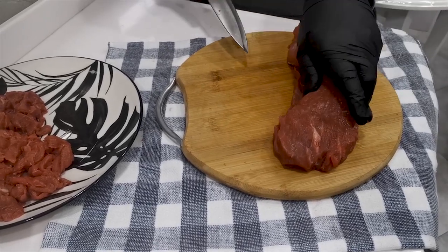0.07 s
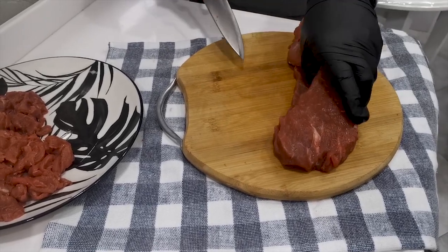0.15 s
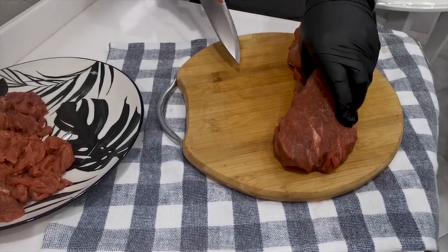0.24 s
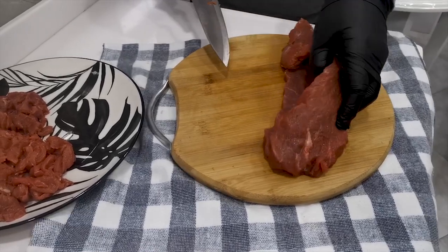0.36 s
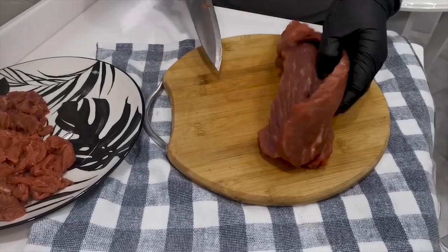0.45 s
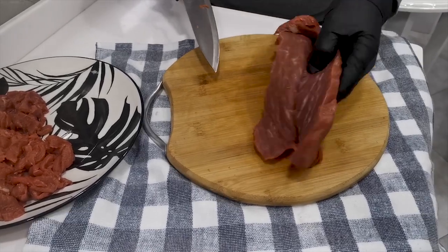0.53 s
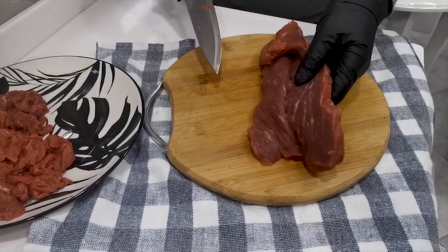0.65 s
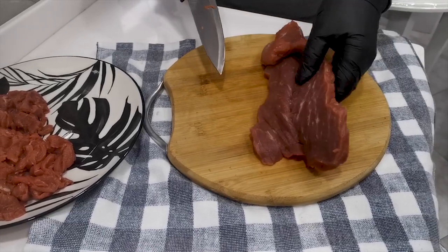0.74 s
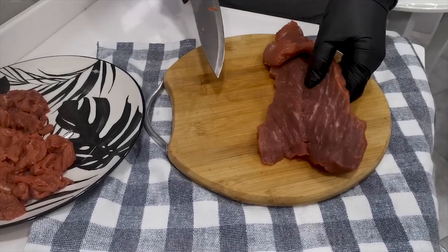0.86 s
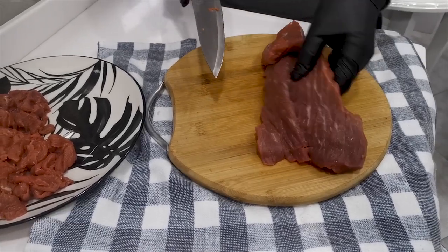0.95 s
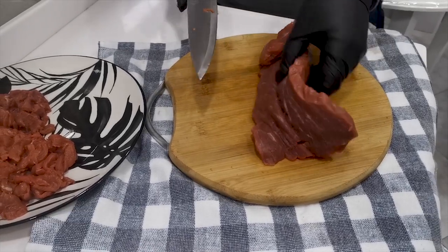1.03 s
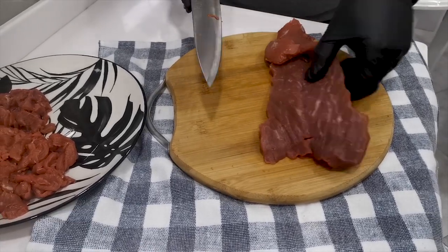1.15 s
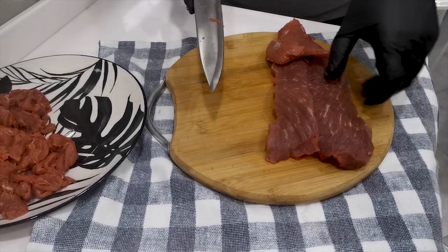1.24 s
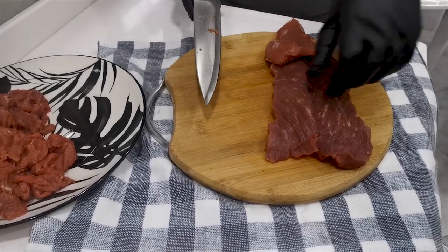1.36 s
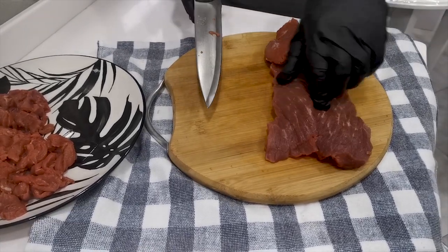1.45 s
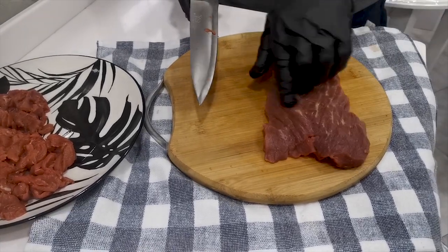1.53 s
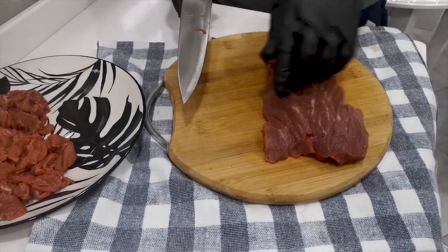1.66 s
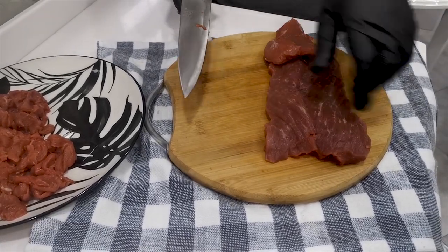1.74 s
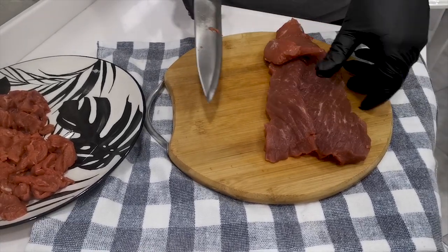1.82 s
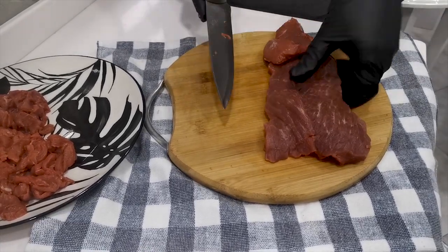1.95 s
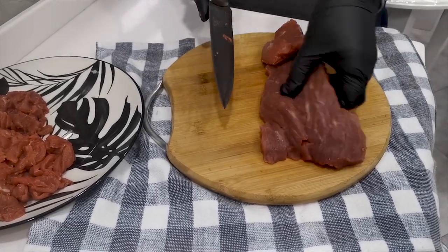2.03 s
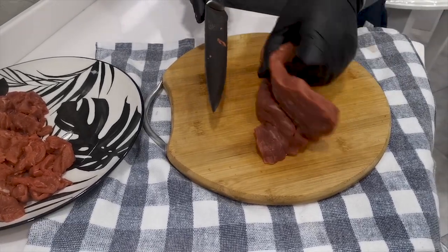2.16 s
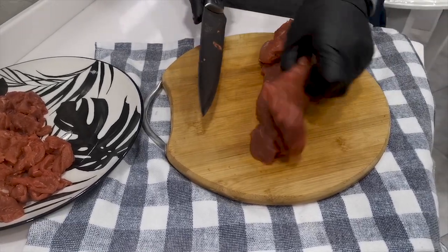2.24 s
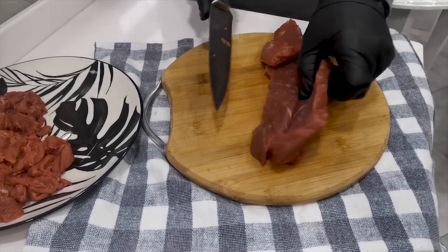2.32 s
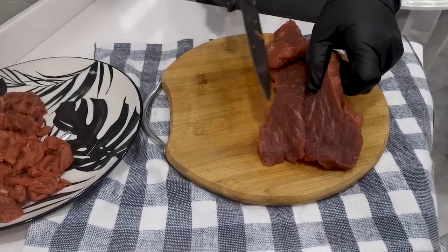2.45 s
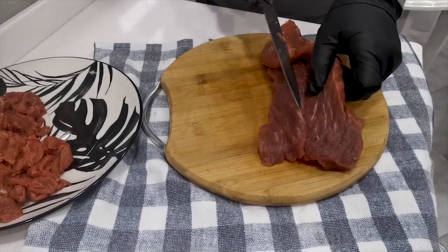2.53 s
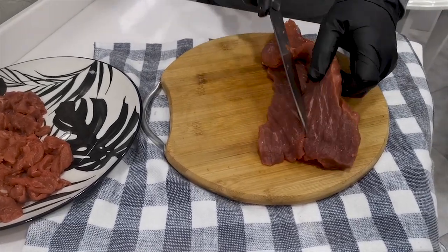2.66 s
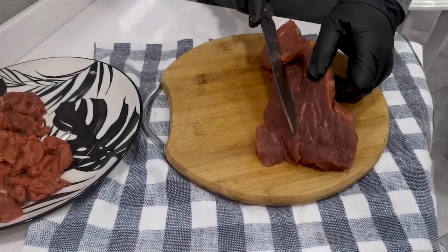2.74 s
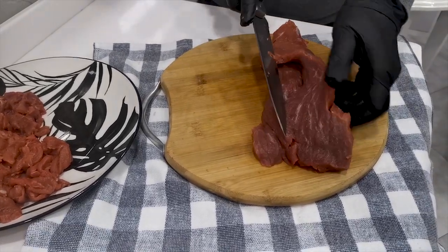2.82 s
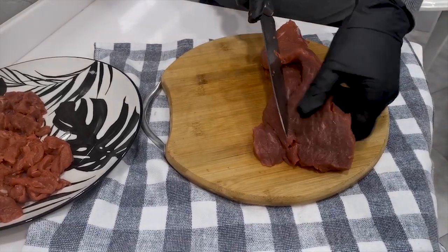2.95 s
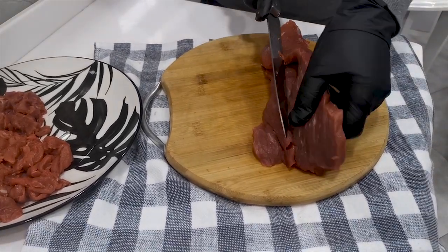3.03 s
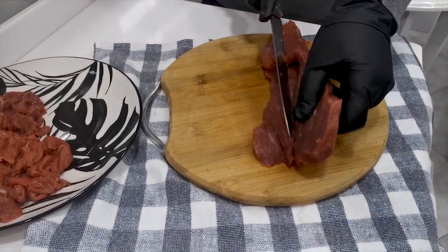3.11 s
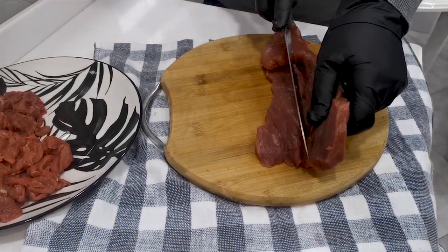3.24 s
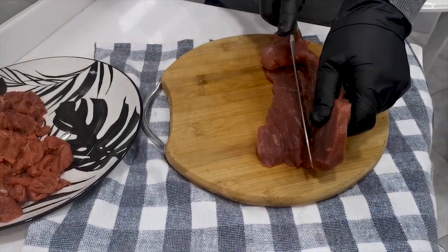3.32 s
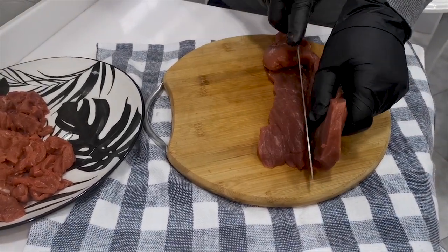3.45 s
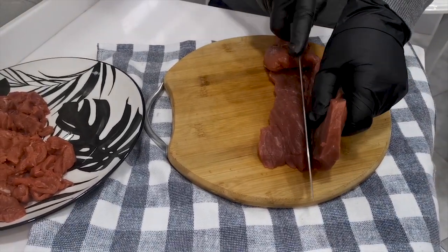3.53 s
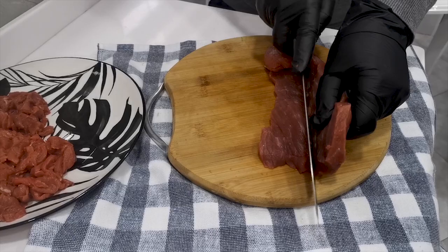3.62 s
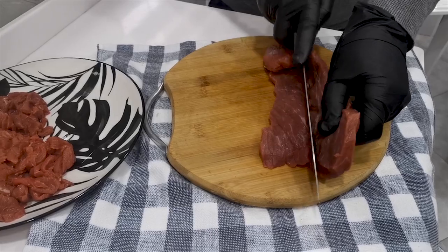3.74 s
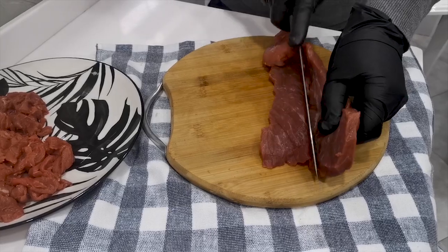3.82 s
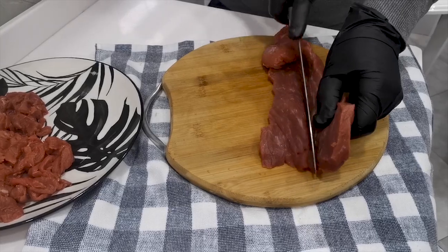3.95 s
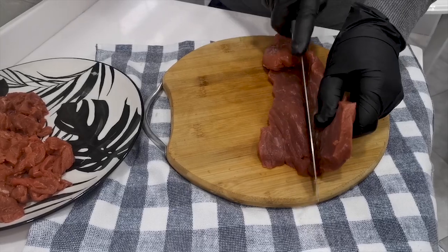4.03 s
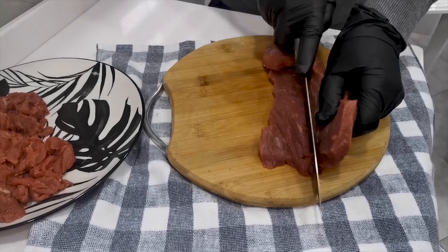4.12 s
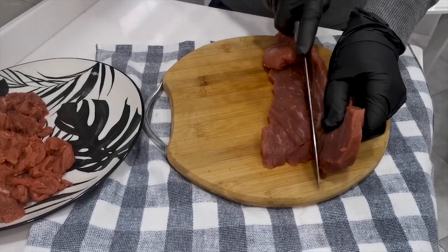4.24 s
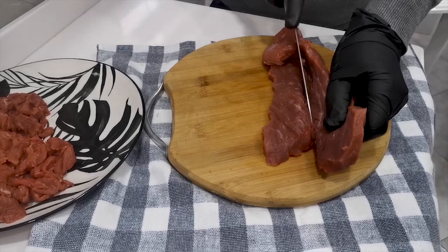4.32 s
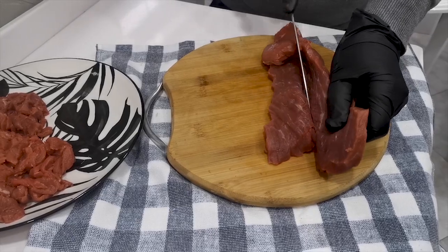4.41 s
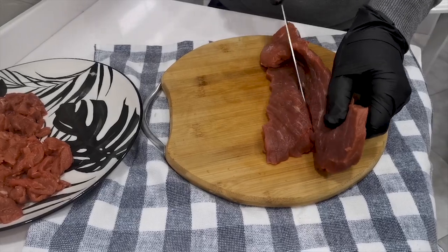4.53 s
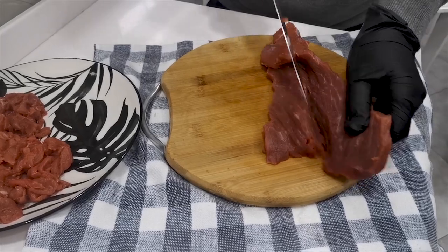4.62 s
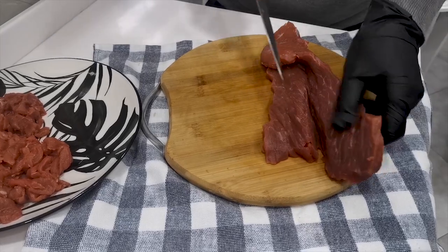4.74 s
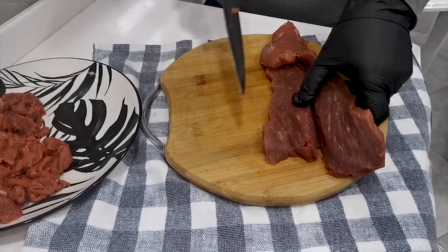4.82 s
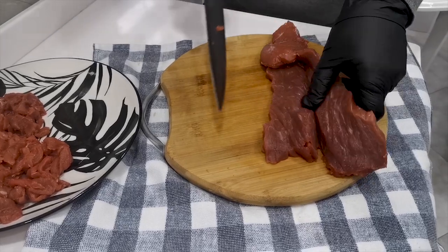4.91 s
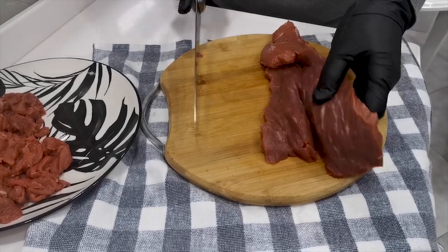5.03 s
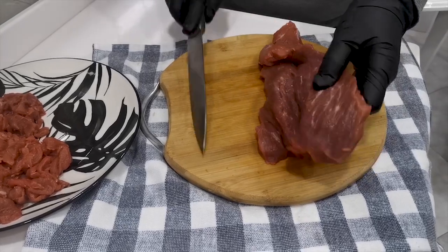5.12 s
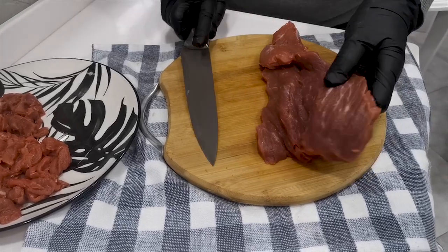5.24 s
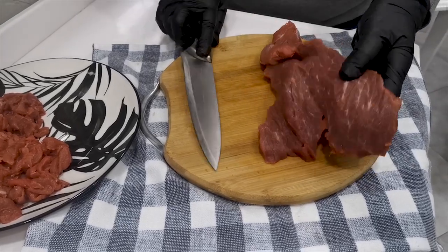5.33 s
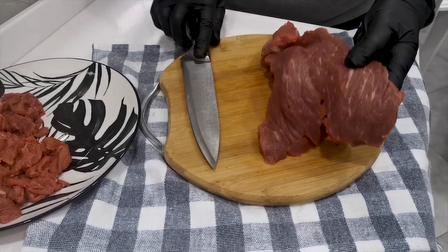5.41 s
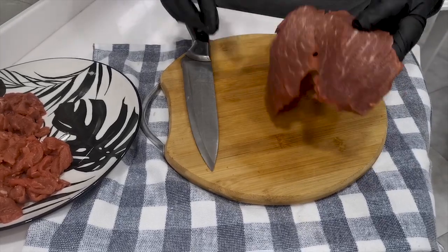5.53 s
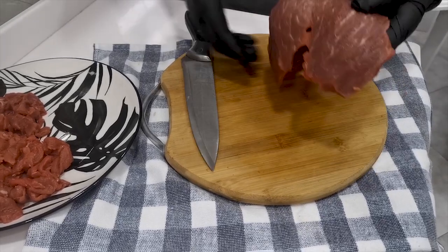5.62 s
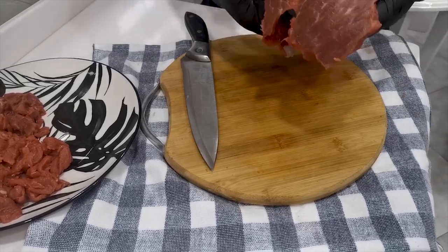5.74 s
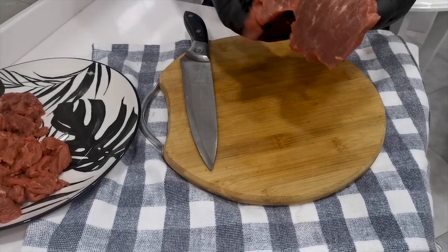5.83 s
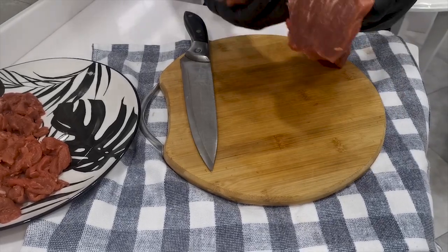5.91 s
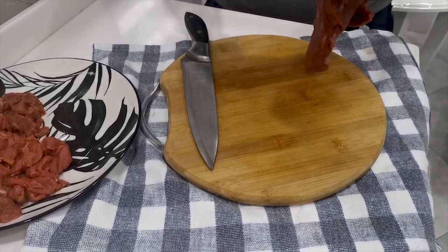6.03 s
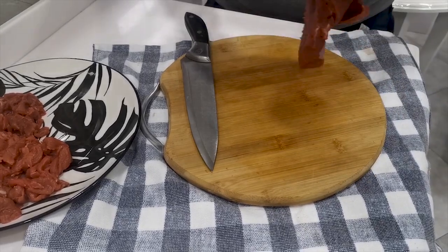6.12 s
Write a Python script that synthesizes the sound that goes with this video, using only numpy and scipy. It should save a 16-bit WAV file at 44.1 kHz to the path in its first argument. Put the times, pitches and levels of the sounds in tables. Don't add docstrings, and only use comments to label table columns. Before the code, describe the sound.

Close stereo pickup over a cutting board in a small reflective kitchen: moist flesh peels and slaps, a rubbery glove ticks and squeaks, and the worktop booms softly under each drop. The handling thins out to faint slicing rubs, broken by one solid thud. More squelching leads to two sharp knife clacks on wood with small bounces, then light sticky handling and a low breeze of air over constant faint hum and hiss.

```python
import sys
import numpy as np
from scipy import signal
from scipy.fft import rfft, irfft, next_fast_len
from scipy.io import wavfile
from scipy.ndimage import map_coordinates

SR = 44100
rng = np.random.default_rng(int(sys.argv[2]) if len(sys.argv) > 2 else 0)


def inscribe(sig):
    pcm = np.round(np.clip(np.atleast_2d(sig).T, -1, 1) * 32767)
    wavfile.write(sys.argv[1], SR, pcm.astype(np.int16))


def invert_db(level):
    return 10 ** (np.asarray(level, dtype=float) / 20)


N = 272097

# frequency in Hz, level in dB per Hz.
ROOM_HUM = [(18, -23), (32, -1), (60, -0.5), (230, -8), (401, -4.5), (600, -11), (791, -17), (968, -14),
            (1070, -19.5), (2060, -19.5), (2460, -27), (2650, -20), (4170, -35), (6720, -29.5),
            (12300, -64), (16000, -91), (22000, -120)]
HUM_DB = -69
# frequency in Hz, level in dB per Hz.
PORT_HISS = [(500, -32), (2000, -11), (7000, -18.5), (11800, -37), (13500, -82)]
# frequency in Hz, time to fall 60 dB in seconds.
KITCHEN_DECAY = [(100, 0.92), (500, 0.73), (1500, 0.46), (4000, 0.17), (10000, 0.16)]
# frequency in Hz, left over right in dB, left lead in radians,
# likeness from 0 to 1.
PORT_DIFFERENCE = [(99, 6, 0.78, 0.94), (597, 3, 0.02, 0.77), (1370, 4, 0.14, 0.75), (2080, -4, 0.5, 0.82),
                   (2890, -3, 0.76, 0.96), (3510, -3, 1.37, 0.16), (4710, 3.5, 3.5, 0.79),
                   (5020, 10, 4, 0.96), (6970, 8, -1, 0.05), (7010, 10, 4.5, 0.11), (8800, -0.5, 4, 0.17),
                   (10700, 0, 3.5, 0.6), (14960, 3, 6.5, 0.92)]
# start in seconds, level in dB, frequency in Hz.
AIR_PUFF = (6.09, -50, 20)

# peak in seconds, swell in seconds, fade in seconds, worktop level in dB,
# board level in dB.
PRESSES = [(0, .05, 0.28, -61, -53.5), (.22, 0.058, 0.076, -58, -61), (0.477, 0.0083, 0.14, -52.5, -43),
           (0.664, 0.0061, 0.12, -46, -42.5), (1.29, 0.49, 0.83, -73, -59.5),
           (1.911, 0.0058, 0.12, -43, -43), (3.88, 0.19, 0.082, -74, -96), (4.152, 0.02, 0.085, -42, -34),
           (4.33, 0.1, .22, -48, -45), (4.9, 0.15, 0.065, -57, -63), (5.244, 0.007, 0.31, -59, -39.5),
           (5.42, 0.0041, 0.045, -56.5, -29), (5.5, 0.066, 0.15, -41, -51), (5.53, .1, 0.24, -52.5, -41),
           (6.1, 0.22, 0.058, -62, -72)]
RESTING_DB = -84, -75
# frequency in Hz, level in dB per Hz.
WORKTOP_MURMUR = [(30, -45.0), (55, -2.5), (75, -1.5), (100, -1.5),
                  (132, -18.5), (165, -8.0), (210, -9.0), (330, -55.0)]
BOARD_MURMUR = [(150, -41.5), (290, 1.5), (420, 1.5), (600, 1.0), (850, -12.0), (1300, -79)]
# frequency in Hz, time to fall 60 dB in seconds.
WORKTOP_MODES = [(75, 0.12), (130, 0.33)]
# start in seconds, peak level in dB, knock frequency in Hz, low mode in dB,
# upper mode in dB.
DROPS = [
    (0.662, -32, 476, -40, -17),
    (1.115, -47.5, 503, -12, -22.5),
    (1.316, -54.5, 420, 6.5, -13),
    (1.905, -34, 362, -35, -20),
    (1.906, -36.5, 536, -40, -40),
    (4.1444, -24.5, 366, -24, -36),
    (4.145, -29, 816, -33, -39),
    (4.312, -41.5, 350, -3, -18),
]

# start in seconds, blow level in dB, end (0 handle, 1 blade),
# brightness in dB an octave, ring level in dB.
KNIFE_CONTACTS = [
    (5.2391, -10, 0, 0.5, -18),
    (5.4155, -9, 1, 2.5, -21.5),
    (5.4195, -24, 1, 2, -21),
    (5.4684, -20.5, 1, 3, -19.5),
    (5.4825, -22, 0.99, -1, -21),
    (5.4895, -26, 0, 1, -26),
    (5.5011, -31, 1, -2, -22),
    (5.519, -29, 0.11, 1, -25),
    (4.1451, -32.5, 0, -7.5, -33),
]
# frequency in Hz, level in dB, time to fall 60 dB in seconds.
KNOCK_MODES = [
    [(552.5, 3, 0.016), (1065, 8.5, 0.012), (1796, 2.5, 0.013), (2790, 9, 0.006), (3650, -7, 0.013),
     (4730, -18.5, 0.02), (6400, -18.5, 0.0067)],
    [(584, -9, 0.014), (1070, 3.5, 0.0049), (1720, -1, .006), (2080, 1, 0.0089), (2660, -3, 0.01),
     (4060, 1.5, 0.0048), (5200, -27.5, 0.014), (5900, -24, 0.011)],
]
# frequency in Hz, level in dB, time to fall 60 dB in seconds.
RING_MODES = [
    [(522, -10, .5), (600, -12, .6), (745, -15, .45), (1038, 1, .31), (1083, 4.5, .2), (1104, -8, .8),
     (1122, 3, .33), (1140, -2.5, .6), (1182, -2, .2), (1242, -8, .31), (1416, -12, .27), (1803, -13, .35),
     (2665, -14, .35), (2731, -16, .4)],
    [(415, -12, .4), (580, -9, .4), (745, -12, .4), (926, -11, .5), (1040, -9, .25), (1340, -12, .4),
     (1630, -13, .3), (1850, -14, .25), (2070, -14, .3), (2670, -11, .4), (2738, -8, .4), (2880, -11, .22)],
]
# frequency in Hz, level in dB per Hz.
BOARD_RATTLE = [(88, -29), (150, -6.5), (282, 0.5), (330, -24), (415, -6), (794, -4.5), (941, -1),
                (1210, -7.5), (2690, -3), (6000, -44), (7800, -81), (13200, -120)]
RING_LAG_S, NODE_HZ = 0.003, 1095

# start in seconds,
# length in seconds, pitch in Hz, level in dB.
SQUEAKS = [(.2, 0.035, 1580, -59.5), (.205, 0.037, 2920, -60), (.28, 0.075, 3000, -50),
           (.405, 0.022, 2090, -59.5), (.49, 0.048, 1028, -52), (.95, .07, 1800, -53),
           (1.085, .03, 5600, -59), (1.12, 0.037, 2770, -52), (1.18, 0.073, 2920, -46.5),
           (1.3, 0.06, 5550, -44), (1.49, 0.021, 5770, -46), (1.505, .03, 2700, -63),
           (2.02, 0.032, 2240, -48.5), (2.065, .11, 1590, -49), (2.86, 0.038, 1880, -50),
           (3.03, 0.051, 1500, -52), (3.52, .2, 3300, -64), (3.58, 0.087, 4200, -65),
           (3.58, .09, 6940, -71), (3.66, 0.097, 6650, -62), (3.855, .05, 6800, -69),
           (4.145, .045, 2040, -48), (4.145, .05, 4800, -47), (4.255, .055, 2070, -50),
           (4.275, 0.033, 860, -53.5), (4.3, 0.032, 6400, -51), (4.71, 0.091, 2100, -54),
           (4.9, .08, 2520, -46.5), (5.04, .08, 1310, -57), (5.13, 0.041, 1800, -47.5),
           (5.446, 0.016, 6800, -46), (5.638, .018, 1840, -50.5), (5.705, 0.023, 5900, -53),
           (5.97, 0.084, 2030, -54)]
# start in seconds, peak level in dB, pitch in Hz.
GLOVE_TICKS = [(0.0303, -48, 5810), (0.198, -58, 6630), (0.2089, -46, 6500), (0.2354, -49, 5700),
               (0.2783, -52, 4300), (0.3292, -49, 5900), (0.5633, -41.5, 6900), (0.6524, -56, 6610),
               (0.7355, -43, 6300), (0.7524, -60, 5800), (0.869, -54, 5740), (0.9462, -66, 6620),
               (1.0316, -60, 4710), (1.1468, -62, 5150), (1.161, -51, 5080), (1.372, -49, 5870),
               (1.491, -47, 5690), (1.5074, -48, 5450), (1.5604, -40.5, 6760), (1.6022, -45, 5830),
               (1.6492, -54, 6450), (1.6672, -34, 5200), (1.7, -35, 6200), (1.731, -44, 5700),
               (1.829, -40.5, 6310), (1.9081, -39, 7600), (2.0173, -47, 5400), (2.1335, -56, 6550),
               (2.155, -45, 6440), (2.1966, -37, 5100), (2.4072, -52.5, 7240), (2.5294, -54, 5700),
               (2.643, -58, 6160), (2.7097, -64, 5650), (2.7427, -55, 5710), (2.7694, -49, 6150),
               (2.837, -60, 5220), (2.91, -46.5, 7450), (2.9467, -48.5, 4360), (3.0226, -37, 6860),
               (3.2316, -56, 5450), (3.478, -55, 6100), (4.0736, -63, 4300), (4.13, -48, 6590),
               (4.6625, -49, 7350), (4.753, -49, 6160), (4.769, -57, 4020), (4.8249, -50, 6660),
               (4.8584, -46, 6080), (4.899, -50, 6010), (5.0234, -55, 6350), (5.2847, -43, 4350),
               (5.444, -53, 4360), (5.67, -50, 5860), (5.7695, -43, 6450), (5.829, -49, 6240),
               (5.9155, -49, 5760), (5.9858, -42, 5730), (5.9933, -44, 5600), (6.1564, -52, 7500)]
# start in seconds, peak level in dB, pitch in Hz.
WET_SMACKS = [(0.1261, -46, 2030), (0.2094, -39, 2860), (0.2428, -38, 2080), (0.2787, -43, 2840),
              (0.4055, -54, 2090), (0.481, -34, 3000), (0.4964, -43, 1070), (0.6115, -43, 1950),
              (0.631, -42, 3050), (0.6606, -42, 2060), (0.6664, -32, 2020), (0.6844, -42, 1100),
              (0.7652, -55, 1870), (0.8684, -45, 3040), (0.9326, -43, 1740), (0.9472, -36, 1160),
              (1.1077, -44, 1840), (1.1248, -56, 2140), (1.147, -30, 2250), (1.1587, -34, 3230),
              (1.1934, -34, 3080), (1.4734, -62, 2720), (1.495, -43, 2730), (1.5086, -35.5, 2730),
              (1.5609, -38, 2800), (1.576, -34, 1670), (1.606, -39, 1660), (1.6657, -29, 1720),
              (1.8296, -59, 2780), (1.8512, -71, 2770), (1.9042, -46, 2060), (1.926, -44, 1530),
              (2.0156, -40, 2250), (2.0662, -37, 2800), (2.0975, -46, 1800), (2.1123, -37, 2030),
              (2.1544, -40, 2200), (2.1949, -41, 2130), (2.2602, -40, 1700), (2.3481, -43.5, 2140),
              (2.4718, -48.5, 2060), (2.82, -47, 2620), (2.8744, -47, 1750), (2.9357, -49, 2090),
              (3.006, -49, 2050), (3.021, -39, 1400), (3.2311, -57, 1990), (3.477, -51, 3130),
              (3.7503, -47, 3220), (4.0735, -44, 1950), (4.6878, -49, 2030), (4.7673, -42, 2050),
              (4.8254, -49, 2310), (4.8998, -31.5, 2080), (4.9138, -40, 2200), (5.1482, -38, 1880),
              (5.685, -50, 1060), (5.768, -54, 2240), (5.9844, -42, 2260), (5.9924, -48, 2000)]

# time in seconds, pitch in Hz.
POCKET_PITCH = [(0, 2400), (.24, 2630), (.96, 1720), (1.17, 2465), (1.91, 1986), (3.09, 1800), (3.45, 2480),
                (3.76, 3200), (3.95, 1960), (4.8, 2390), (5.15, 1530), (5.7, 2102)]
# frequency in Hz, level in dB per Hz.
FLESH_COLOUR = [(410, -51), (700, -43), (975, -9), (1050, -8), (1370, -3), (1930, -3.5), (3150, -2.5),
                (3660, -10.5), (4600, -12), (5980, -58.5), (10100, -120)]
GLOVE_COLOUR = [(2060, -20), (3500, -11), (4190, -8), (5710, -8.5), (6230, -9.5), (7650, -10.5),
                (10400, -35.5), (11400, -30.5), (13400, -34.5), (15400, -31)]
# peak in seconds, fade in seconds, squelch level in dB, rustle level in dB.
GRIPS = [(.208, 0.061, -53, -60), (.479, 0.125, -49, -56), (.661, 0.33, -51, -68.5),
         (.935, 0.092, -68, -85), (1.115, 0.22, -46.5, -64), (1.5, 0.061, -46.5, -56.5),
         (1.906, 0.19, -54, -57), (2.642, 0.024, -76, -68.5), (3.23, 0.12, -64.5, -74.5),
         (4.076, 0.22, -58.5, -67.5), (4.666, 0.67, -67, -72.5), (4.896, 0.19, -51.5, -61),
         (5.235, 0.46, -51.5, -64.5), (5.419, .12, -61.5, -62), (5.768, 0.035, -69, -59.5)]
# peak in seconds, swell in seconds, fade in seconds,
# squelch level in dB, rustle level in dB.
SLIDES = [(.038, 0.062, .22, -57, -63), (.316, 0.12, 0.24, -58.5, -65), (.645, 0.043, 0.13, -55, -60.5),
          (.988, 0.13, 0.048, -51.5, -70.5), (1.31, 0.29, 0.078, -55.5, -58.5),
          (1.64, 0.15, 0.3, -55, -61.5), (2.1, 0.13, 0.14, -49, -65), (2.22, 0.48, 0.26, -60, -64),
          (5.9, 0.17, 0.055, -66, -70.5), (2.871, 0.068, 0.07, -51.5, -64.5),
          (2.95, 0.028, 0.036, -60, -69), (3.028, 0.073, 0.14, -52, -62), (3.67, 0.3, 0.13, -65.5, -70),
          (3.886, 0.071, 0.16, -73, -73), (4.152, 0.044, 0.075, -51.5, -60), (4.306, 0.1, 0.23, -52.5, -61),
          (4.872, 0.19, 0.18, -56, -64), (5.15, 0.28, 0.095, -51, -64.5), (5.634, 0.09, 0.069, -76, -79),
          (5.72, 0.17, 0.19, -79, -65.5), (6.04, 0.1, 0.075, -52.5, -53), (6.168, 0.054, .1, -64, -72)]
GRAB_S = 0.0098
EASE_DB, EASE_BEND = 18, 1.153


def unit(x):
    return x / np.sqrt(np.mean(x ** 2) + 1e-20)


def along(points, hz, axis=1):
    table = np.transpose(points)
    return np.interp(np.log(hz + 1), np.log(table[0] + 1), table[axis])


def curves(rows):
    s, *columns = np.transpose(rows)
    return [np.interp(np.arange(N) / SR, s, column) for column in columns]


def wobble(rate):
    knots = rng.standard_normal(int(N * rate / SR) + 4)
    return map_coordinates(knots, [np.arange(N) * rate / SR])


def filtered(x, response):
    m = next_fast_len(N + SR // 2)
    return irfft(rfft(x, m) * response(np.fft.rfftfreq(m, 1 / SR)), m)[..., :N]


def dulled(x):
    return filtered(x, lambda hz: 1 / (1 + 1j * hz / 9000) ** 3)


def noise(spectrum):
    return unit(filtered(rng.standard_normal((2, N)), lambda hz: invert_db(along(spectrum, hz))))


def rings(s, db, hz, t60, rise, size):
    t = np.arange(size) / SR
    s, db, hz, t60 = (np.asarray(v, float)[:, None] for v in (s, db, hz, t60))
    fading = invert_db(db - 60 * t / t60) * (1 - np.exp(-t / rise))
    wave = fading * np.sin(2 * np.pi * hz * t)
    at = np.round(s * SR).astype(int) + np.arange(size)
    return np.bincount(at.ravel(), wave.ravel(), N + size + SR)[:N]


def grains(pitch_hz, spread, cycles, scatter_db, count):
    def shower():
        s = rng.uniform(0, (N - 1) / SR, count)
        hz = pitch_hz[(s * SR).astype(int)] * np.exp(spread * rng.standard_normal(count))
        size_db = scatter_db * np.minimum(rng.exponential(1, count), 3.5)
        return rings(s, size_db, hz, cycles / hz, rise=0.00012, size=160)
    return unit(dulled(np.array([shower(), shower()])))


def efforts(moves):
    s, swell, fade, *levels_db = np.transpose(moves)
    age = np.arange(0, N + 32, 32) / SR - s[:, None]
    progress = np.maximum(-age / swell[:, None], age / fade[:, None])
    shape_db = -EASE_DB * progress ** EASE_BEND
    sums = [np.sqrt(np.sum(invert_db(db[:, None] + shape_db) ** 2, axis=0)) for db in levels_db]
    return [np.interp(np.arange(N) / 32, np.arange(len(v)), v) for v in sums]


def roomy(x, wet_db):
    hz, t, z = signal.stft(rng.standard_normal((2, SR * 2 // 3)), SR, nperseg=256)
    decay = invert_db(-60 * t / along(KITCHEN_DECAY, hz)[:, None])
    tail = signal.istft(z * decay, SR, nperseg=256)[1]
    tail *= 1 - np.exp(-np.arange(tail.shape[1]) / SR / 0.0018)
    x = np.atleast_2d(x)
    wet = signal.fftconvolve(x[:1], tail / np.linalg.norm(tail[0]), axes=1)[:, :N]
    direct = x if len(x) == 2 else x * [[1], [0]]
    return invert_db(wet_db) * wet + direct


def ports(pair):
    def response(hz):
        turn = np.arccos(np.clip(along(PORT_DIFFERENCE, hz, axis=3), 0, 1)) / 2
        lead = along(PORT_DIFFERENCE, hz, axis=2)
        half = invert_db(along(PORT_DIFFERENCE, hz) / 2) * np.exp(1j * lead / 2)
        left = [np.cos(turn) * half, np.sin(turn) * half]
        right = [np.cos(turn) / half, -np.sin(turn) / half]
        return np.array([left, right])
    return filtered(pair[None], response).sum(axis=1)


def room_tone():
    hum = ports(noise(ROOM_HUM) * invert_db(0.66 * wobble(3.5)))
    return invert_db(HUM_DB + 1.5) * hum + invert_db(HUM_DB - 7.0) * noise(PORT_HISS)


def puff():
    s, db, hz = AIR_PUFF
    return rings([s], [db], [hz], [0.3], rise=0.0046, size=SR // 4) * invert_db([[2.5], [-2.5]])


def pressure():
    on_top, on_board = (load + invert_db(db) for load, db in zip(efforts(PRESSES), RESTING_DB))
    top = on_top * invert_db(-8.5 + 0.23 * wobble(5.2)) * noise(WORKTOP_MURMUR)
    board = on_board * invert_db(-14.5 + 2.84 * wobble(30)) * noise(BOARD_MURMUR)
    return top + board


def drops():
    s, db, knock_hz, *mode_db = np.transpose(DROPS)
    out = rings(s, db - 5, knock_hz, s * 0 + 0.06, rise=0.0015, size=2048)
    for (hz, t60), rel_db in zip(WORKTOP_MODES, mode_db):
        out += rings(s, db + rel_db + 8, s * 0 + hz, s * 0 + t60, rise=0.011, size=16384)
    return roomy(out, wet_db=-12)


def knife():
    knocks, ringing, rattle = np.zeros((3, N))
    t = np.arange(N) / SR
    board = noise(BOARD_RATTLE)
    loose = invert_db(0.6 * wobble(45))
    blade_s = KNIFE_CONTACTS[1][0]
    low_hz, low_t60 = WORKTOP_MODES[0]
    for s, db, end, bright_db, ring_db in KNIFE_CONTACTS:
        hz, level, t60 = np.transpose(KNOCK_MODES[int(end)])
        tilted_db = db + level + bright_db * np.log2(hz / 1000)
        knocks += rings(s + 0 * hz, tilted_db, -hz, t60, rise=0.0014, size=2048)
        knocks += rings([s], [db - 23.5], [low_hz], [low_t60], rise=0.012, size=SR // 4)

        hz, level, t60 = np.transpose(RING_MODES[int(end)])
        signed_hz = np.sign(hz - NODE_HZ) * hz
        ring = rings(s + RING_LAG_S + 0 * hz, db + level + ring_db, signed_hz, t60, rise=0.0056, size=SR // 3)
        if s < blade_s:
            ring *= invert_db(-400 * np.maximum(t - blade_s, 0))
        ringing += ring

        age = np.maximum(t - s, 0)
        rattle += invert_db(db + ring_db - 4.5 - 60 * age / 0.53) * (1 - np.exp(-age / 0.00059))
    ringing = loose * ringing * [[1.2], [0.3]]
    return roomy(knocks, wet_db=-11.5) + ringing + rattle * invert_db(3.2 * wobble(90)) * board


def squeaks():
    s, length, hz, db = np.repeat(SQUEAKS, 36, axis=0).T
    when, detune, size = rng.uniform(-1, 1, (len(s), 3)).T
    ring_hz = hz * (1 + (0.017 + 0.36 * length) * detune)
    slip_s = s + length * (when + 1) / 2
    slip_db = db + 4 * size - 8 * when ** 2
    return roomy(rings(slip_s, slip_db, ring_hz, 30 / hz, rise=0.00033, size=1024), wet_db=-8)


def snaps(events, lift_db, t60, edge_db, low_hz, top_hz, edge_t60, wet_db):
    s, db, hz = np.transpose(events)
    steps = np.arange(12)
    side, *chance = rng.uniform(0, 1, (len(s), 1 + 2 * len(steps))).T
    place, late = np.split(np.array(chance), 2)
    crack_hz = low_hz + (top_hz - low_hz) * (steps[:, None] + place) / len(steps)
    crack_s = s + 0.0012 * late

    def burst(db):
        crack_db = np.tile(db + edge_db, len(steps))
        crack_t60 = np.full(late.size, edge_t60)
        crack = rings(crack_s.ravel(), crack_db, crack_hz.ravel(), crack_t60, rise=0.0001, size=384)
        return rings(s, db + lift_db, hz, s * 0 + t60, rise=0.000067, size=768) + crack

    def small(f):
        return (1j * f / 900 / (1 + 1j * f / 900)) ** 2

    left = burst(np.where(side > 0.5, db, -200))
    right = burst(np.where(side > 0.5, -200, db))
    return roomy(filtered(np.array([left + right, 0.5 * (left - right)]), small), wet_db=wet_db)


def ticks():
    return snaps(GLOVE_TICKS, lift_db=1, t60=0.007, edge_db=0, low_hz=3000, top_hz=10800,
                 edge_t60=0.005, wet_db=-12)


def smacks():
    return snaps(WET_SMACKS, lift_db=-1, t60=0.011, edge_db=-8.5, low_hz=1100, top_hz=4400,
                 edge_t60=0.006, wet_db=-11)


def hands():
    grips = np.insert(GRIPS, 1, GRAB_S, axis=1)
    squelch, rustle = efforts(np.vstack([grips, SLIDES]))
    pops = grains(curves(POCKET_PITCH)[0], spread=0.13, cycles=59, scatter_db=3.0, count=6000)
    crackle = grains(np.full(N, 6300.0), spread=0.22, cycles=24, scatter_db=5, count=5000)
    flesh = 0.55 * pops + 0.86 * noise(FLESH_COLOUR)
    glove = 0.5 * crackle + 0.84 * noise(GLOVE_COLOUR)
    clumps = 0.6 * wobble(70)
    flesh = squelch * invert_db(-2.0) * unit(flesh * invert_db(2 * clumps + 2.3 * wobble(150)))
    glove = rustle * invert_db(3.5) * unit(glove * invert_db(1.3 * clumps + 1.5 * wobble(120)))
    return roomy(flesh + glove, wet_db=-10.5)


def scene():
    clicks = dulled(smacks() + ticks() + knife())
    kitchen = hands() + clicks + squeaks() + drops() + pressure()
    return ports(kitchen) + room_tone() + puff()


def low_pass(x):
    return signal.sosfilt(signal.butter(12, 15150, fs=SR, output="sos"), x)


def record(dry):
    return low_pass(dry)


dry = scene()
out = record(dry)
inscribe(out)
```